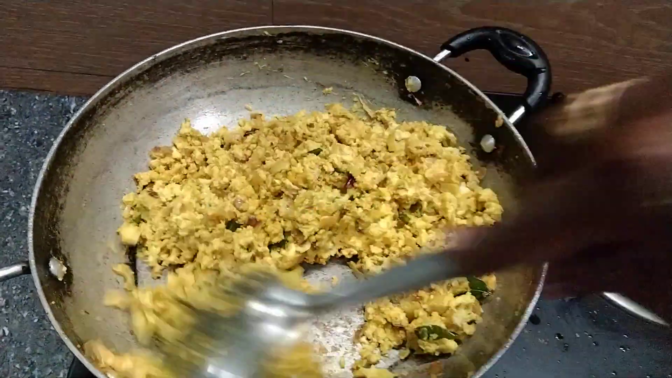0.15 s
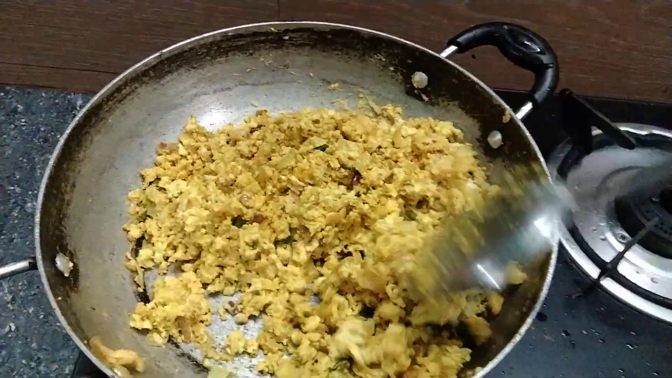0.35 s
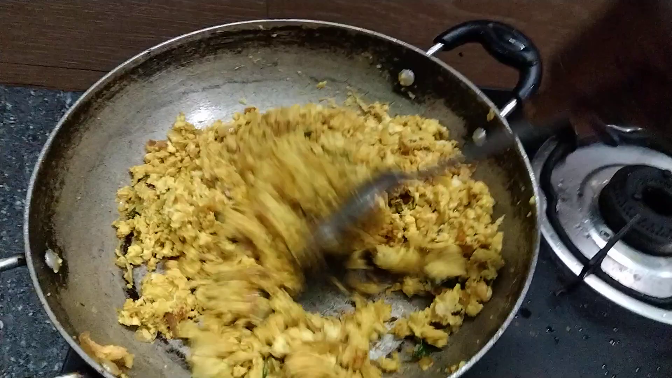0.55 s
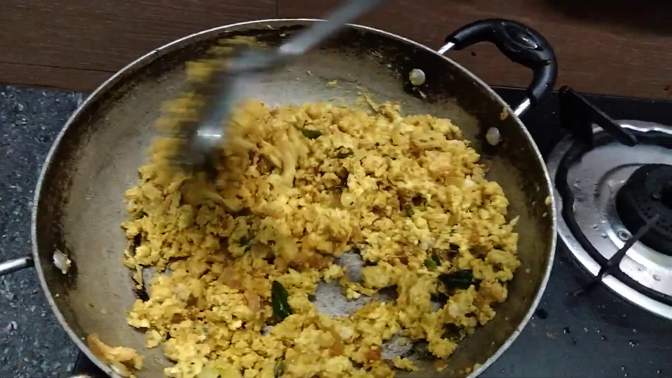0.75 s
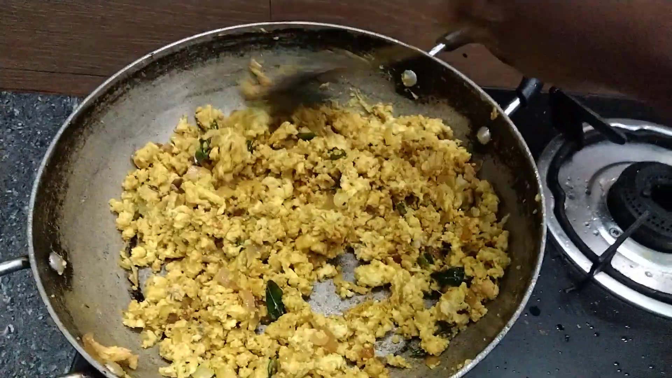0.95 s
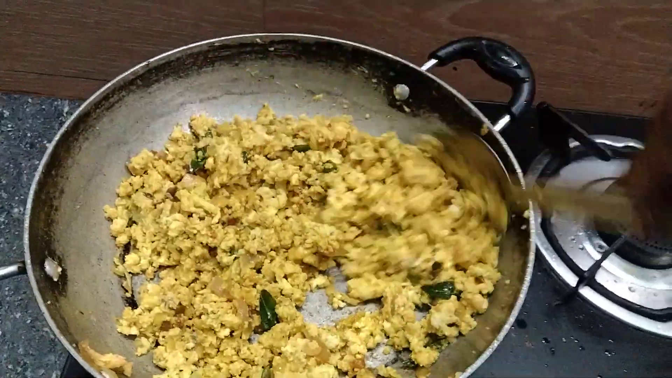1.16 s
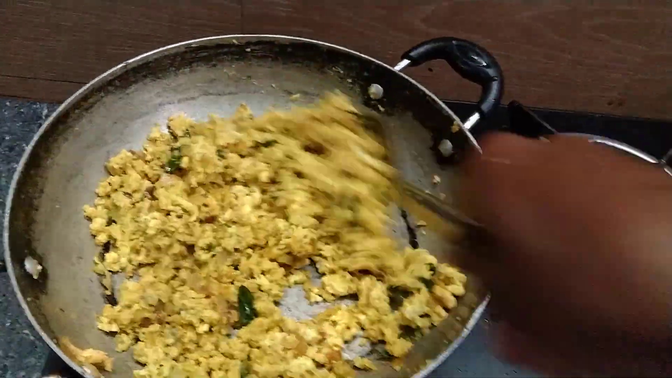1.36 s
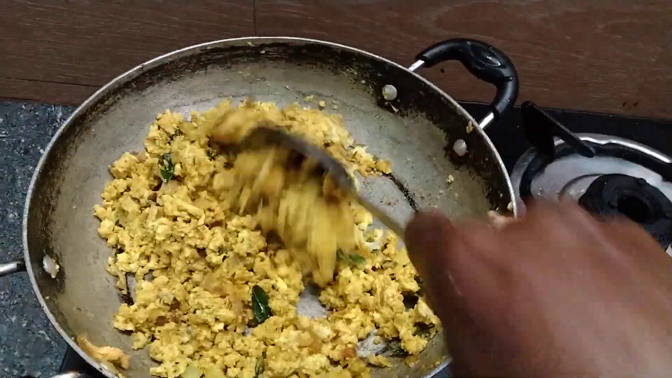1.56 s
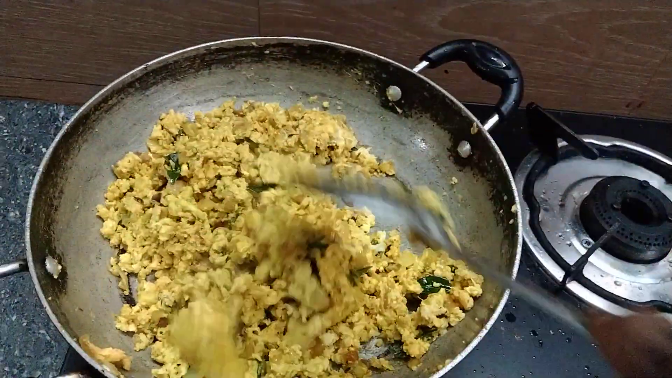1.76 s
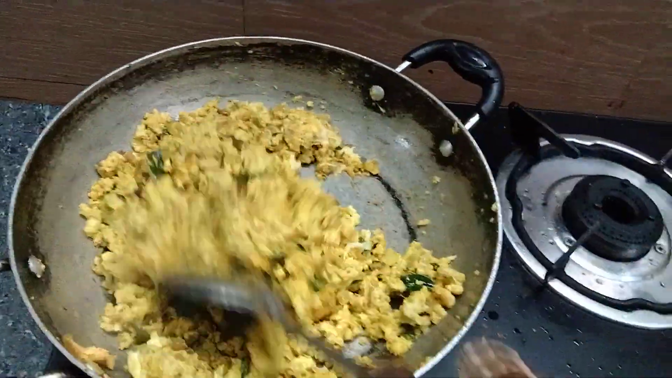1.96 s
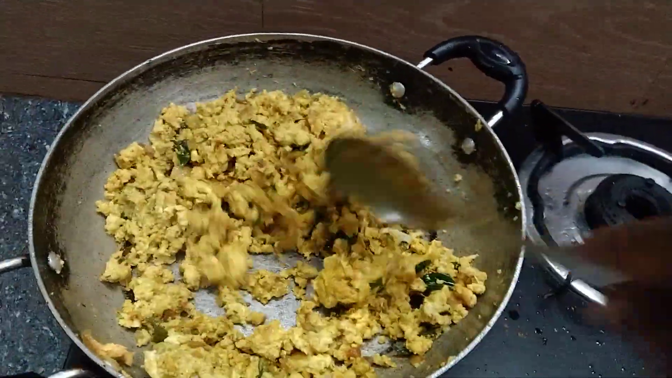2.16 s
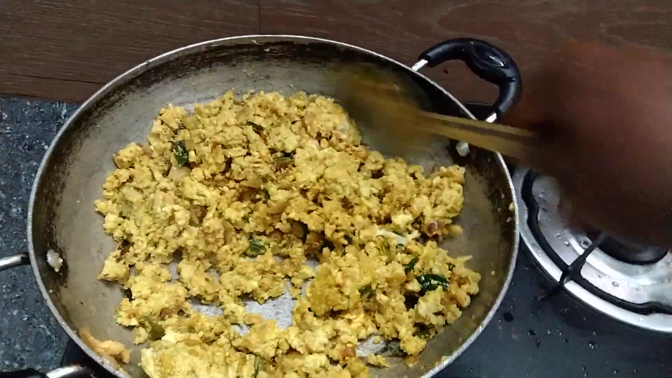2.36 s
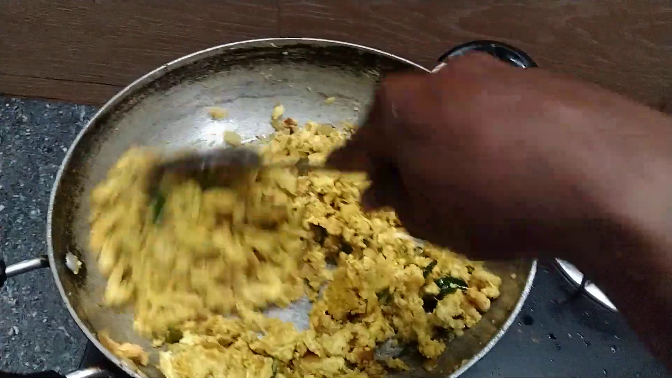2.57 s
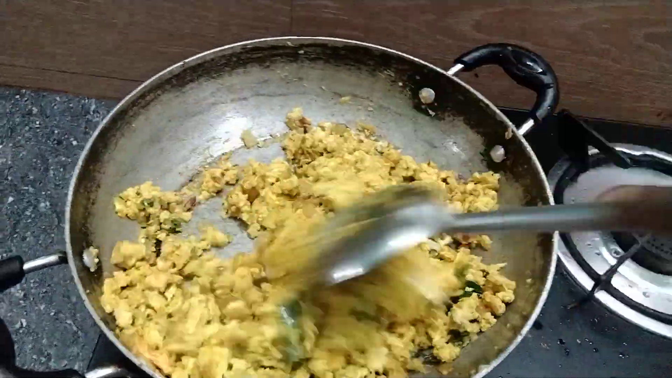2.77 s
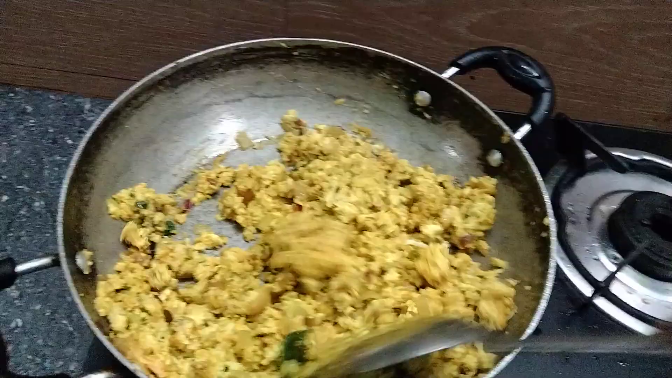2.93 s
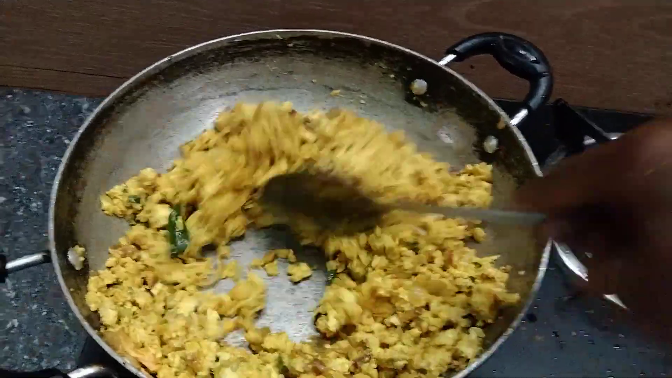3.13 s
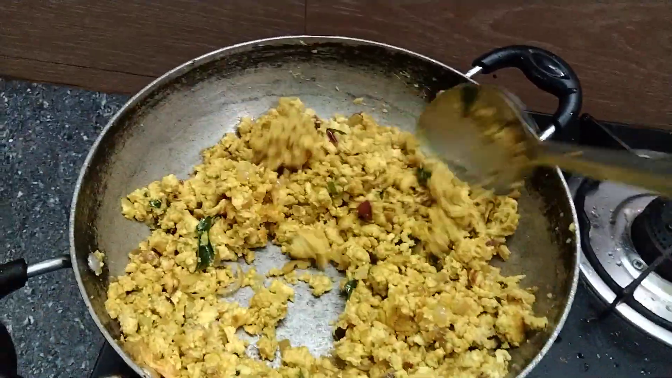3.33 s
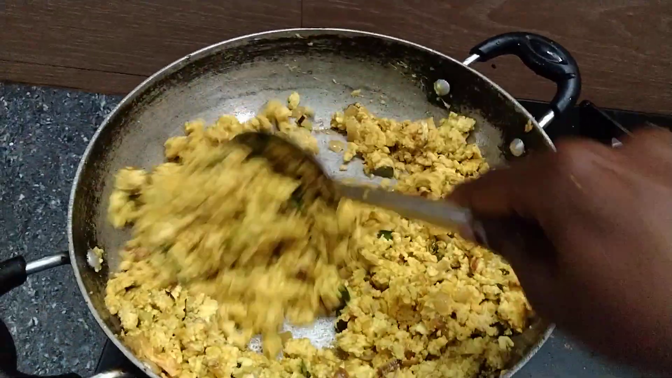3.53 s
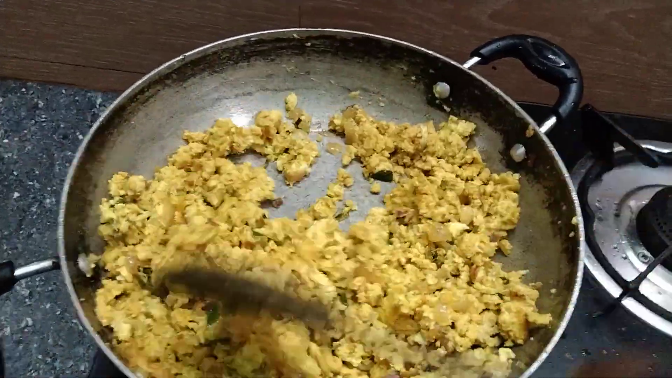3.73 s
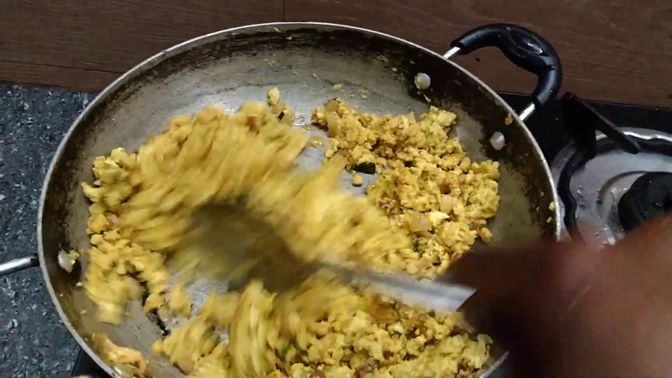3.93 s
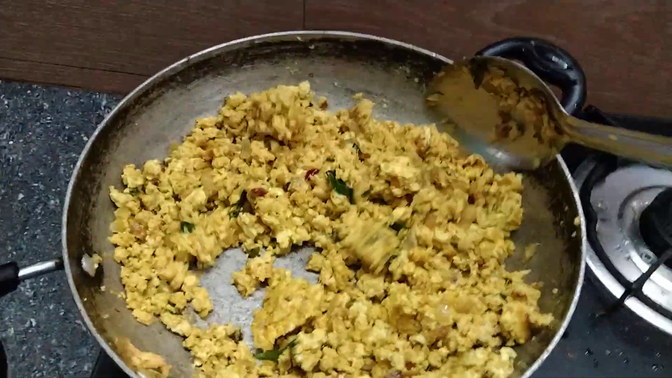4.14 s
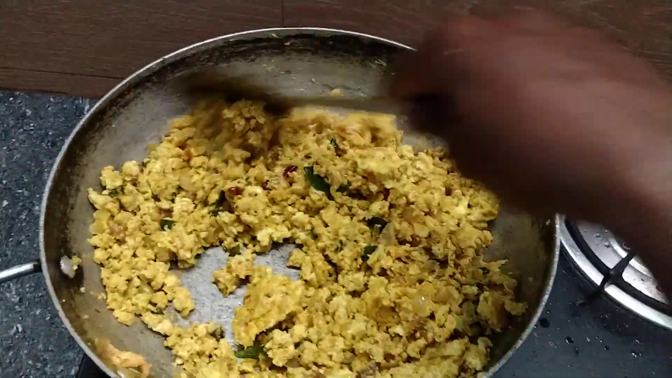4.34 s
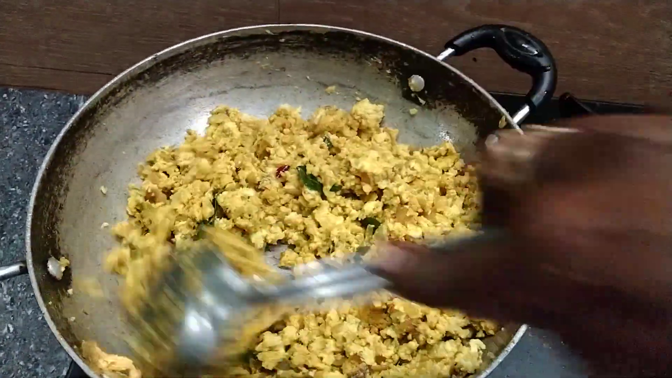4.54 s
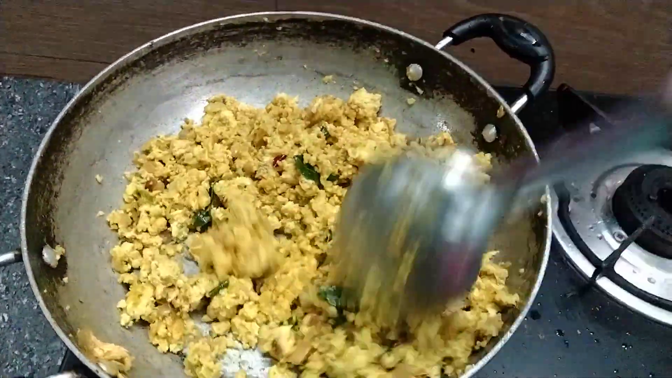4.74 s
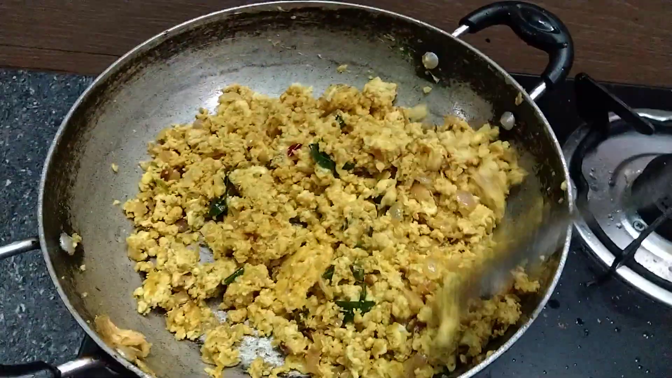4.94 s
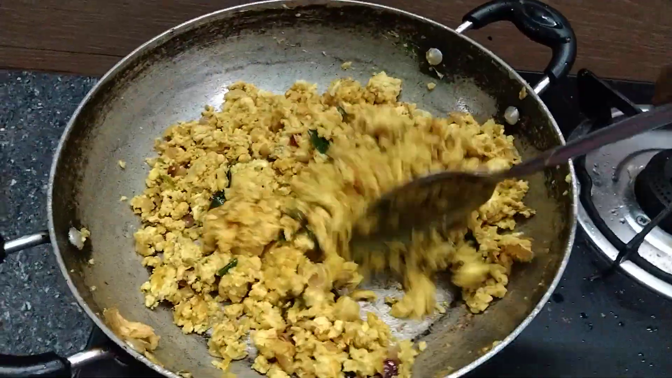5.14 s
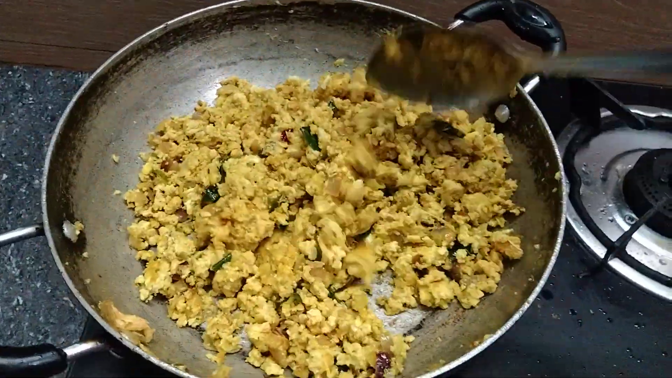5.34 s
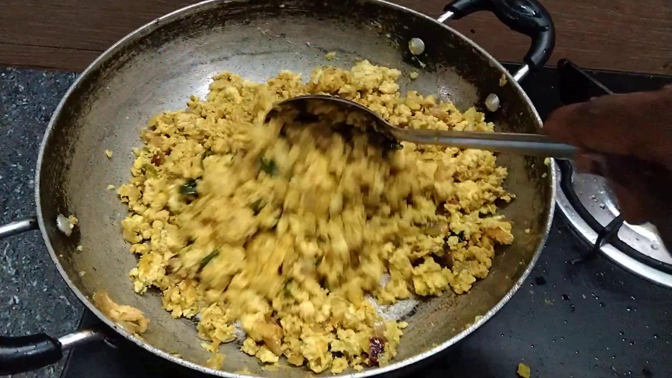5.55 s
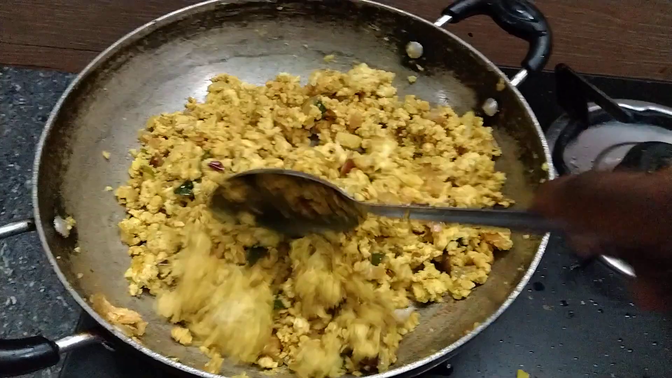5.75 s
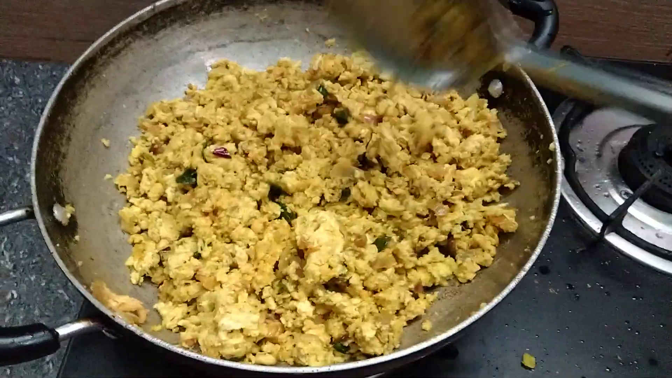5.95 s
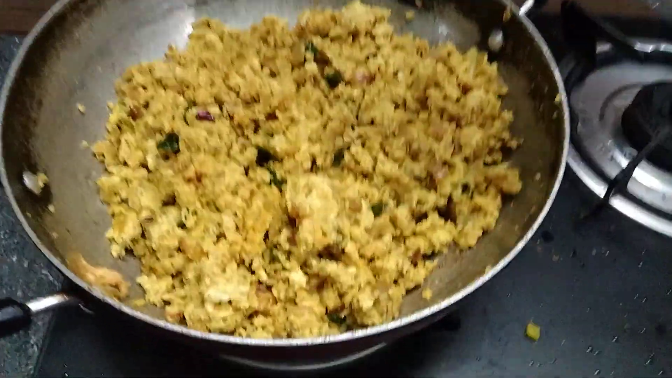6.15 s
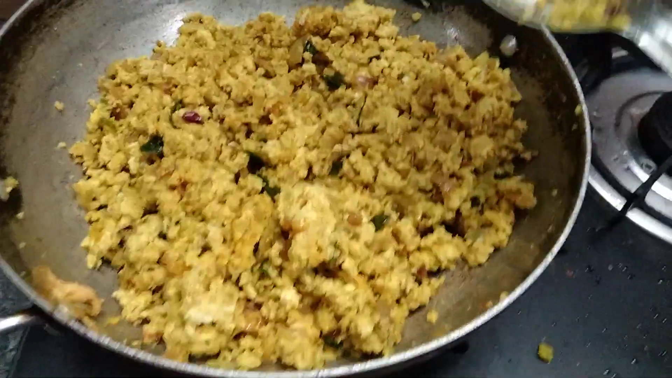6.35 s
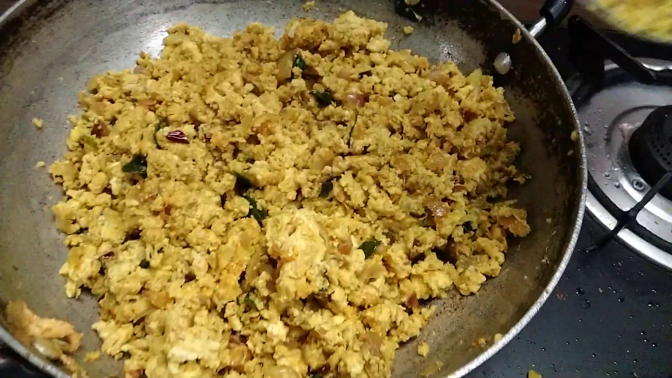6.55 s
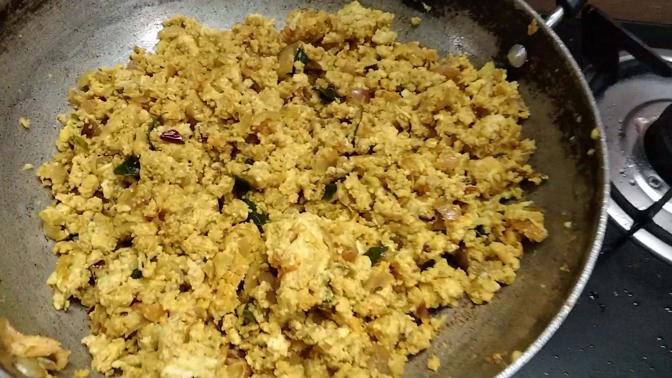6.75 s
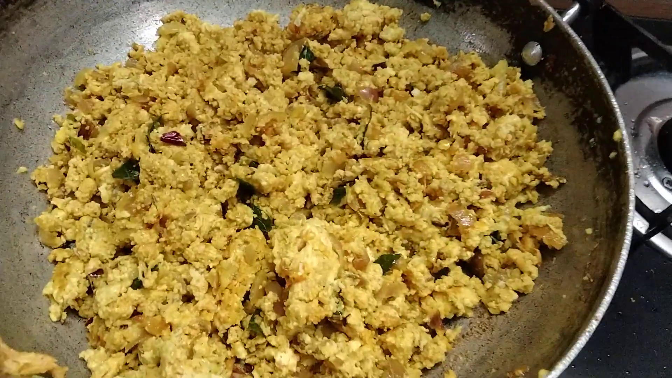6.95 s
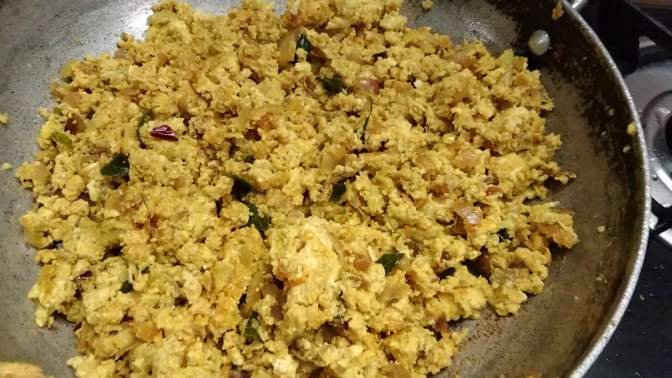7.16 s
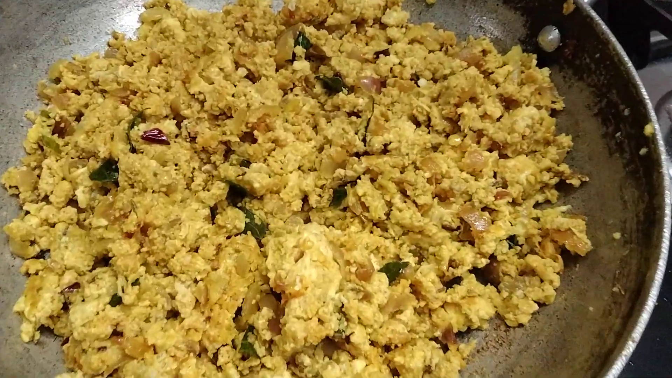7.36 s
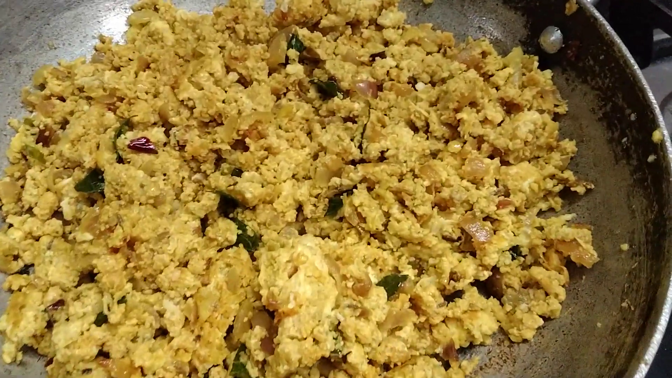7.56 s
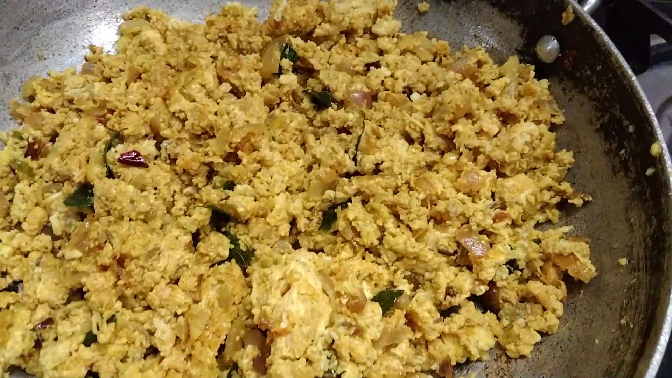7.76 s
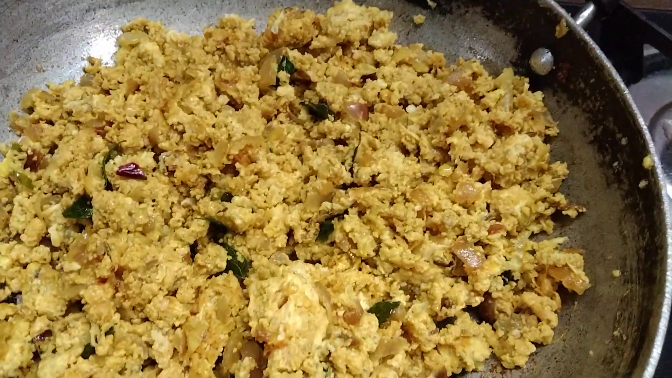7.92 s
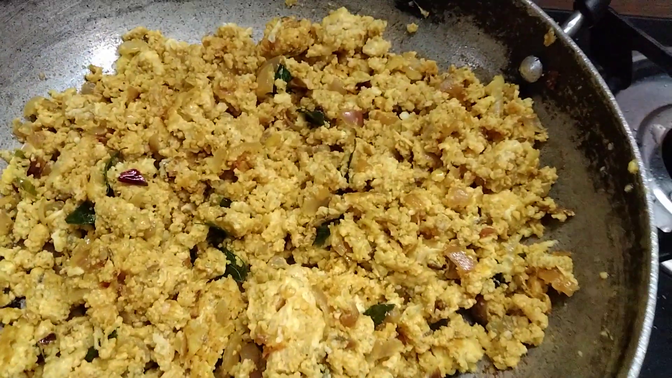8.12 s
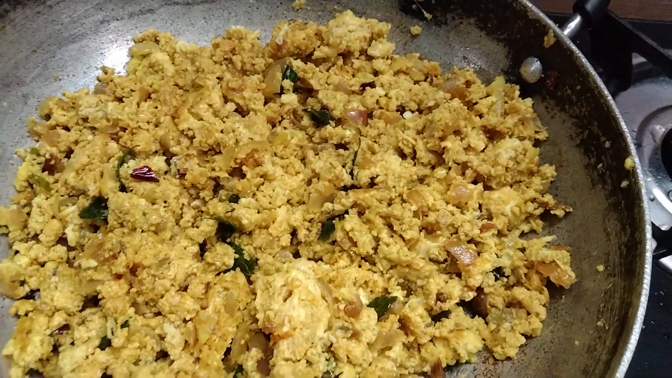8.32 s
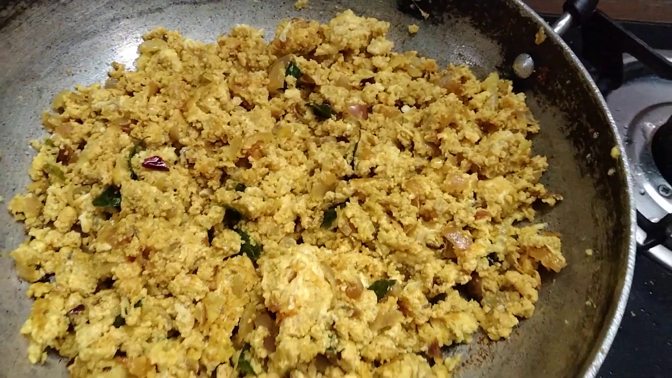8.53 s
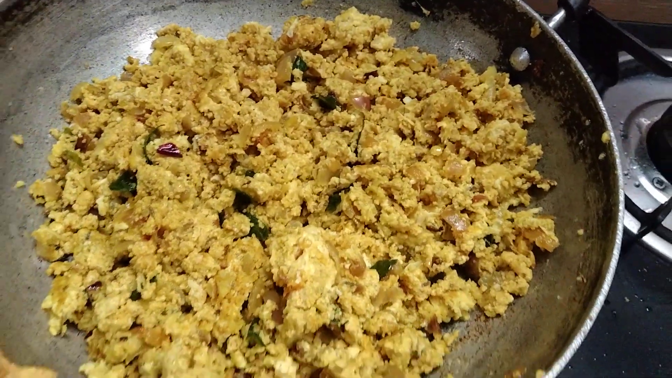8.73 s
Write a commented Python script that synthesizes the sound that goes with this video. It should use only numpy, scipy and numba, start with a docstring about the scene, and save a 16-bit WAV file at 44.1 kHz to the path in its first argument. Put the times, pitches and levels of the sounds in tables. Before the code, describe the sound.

A close, slightly thin phone-like pickup in a small hard kitchen. Moist food sizzles steadily over a faint low hum. A steel spatula scrapes the pan from 0 to 0.2 s, then clanks sharply near 0.6 with a short rattle and scrape. Another edgy knock and scrape come at 1.0, a light touch at 1.3 and a squeaky scrape around 1.45. A bright clank at 2.05 leads into scraping; a very faint brief hoot lies beneath. Softer strokes follow at 2.5-2.7, then a strong clank and loud scrape at 3.1-3.25, with a fat pop at 3.35. Light contact at 3.95 precedes squealing scrapes and clustered knocks at 4.3-4.7. Small taps end the stirring at 5.1-5.2. From about 6.3 the sizzle is quieter and sputtery, with scattered snaps, thickest around 8.2, and soft rustles near 6.6 and 7.6.

```python
"""A steel spatula knocks on a food-damped steel pan, then scrapes along it with brief thin squeals.
Knocks are short rattling clanks; scrapes are stick-slip clicks through moving blade and pan modes.
Each stroke swells, eases and stirs up a hiss; the food sizzles and pops, quieter once left alone.
Sizzle is dense steam bursts coloured by the bowl; two soft rustles, a brief faint tone and a low hum
lie behind. The pan and frying sounds ring on in a small hard kitchen."""
import sys
import numpy as np
from scipy import signal
from scipy.fft import rfft, irfft
from scipy.io import wavfile
from scipy.ndimage import uniform_filter1d
from numba import njit

SR = 44100
rng = np.random.default_rng(int(sys.argv[2]) if len(sys.argv) > 2 else 0)


def store_wav(level_fs):
    """Save 16-bit WAV to argv[1]."""
    pcm = np.round(np.clip(np.atleast_2d(level_fs), -1, 1) * 32767)
    wavfile.write(sys.argv[1], SR, pcm.T.astype(np.int16))


N = 387638
T = np.arange(N) / SR
SIZE = 8192  # FFT length for responses
FREQS = np.maximum(np.fft.rfftfreq(SIZE, 1 / SR), 1)  # Hz

# All resonance widths are taken 6 dB down.
# low air rush: f/Hz, width/Hz, level/dB
RUMBLE = [(93, 74, -2), (145.4, 46, 3), (230.5, 41, 0.5), (329, 82, -7)]
# soft low rustles: start/s, loudest/s, end/s, level/dB
RUSTLES = [(6.405, 6.63, 7.07, -56), (7.54, 7.63, 8.04, -57)]
# rustle body: f/Hz, width/Hz, level/dB
RUSTLE_BODY = [(222, 126, 2), (413, 126, 1), (700, 520, -8)]
# bowl resonances colouring the sizzle: f/Hz, width/Hz, level/dB
BOWL = [(938, 222, 2), (1377, 280, 8), (1916, 480, -1), (2735, 710, -0.5), (3340, 1860, 0.5),
        (5780, 3300, -1), (6850, 2160, 3.5), (9730, 1270, -5.5), (13900, 5800, 0.5)]
# dips that thin the sizzle's colour: f/Hz, width/Hz, depth/dB
DIPS = [(2320, 230, 1), (4390, 610, 1.5), (12000, 2100, 1.5)]
# frying between strokes: t/s, sizzle/dB, fine spray/dB
FRYING = [(0.0, -49, -53.5), (1.6, -49.5, -53), (2.25, -49, -57.5), (2.65, -50.5, -52.5), (3.05, -48, -57),
          (3.5, -47.5, -50.5), (4.3, -49.5, -53), (5.6, -48.5, -52.5), (6.3, -53.5, -60), (8.79, -54, -73)]
# spray flicker, small while the food moves and larger at rest: t/s, spread/dB
SPUTTER = [(5.6, 0.8), (8.79, 4)]
# fat spitting: t/s, peak/dB (before pop_db)
POPS = [(1.412, -35), (3.340, -23.5), (5.079, -37), (6.405, -35), (6.5357, -29.5), (7.029, -39),
        (7.33, -36), (7.648, -31), (7.7985, -33), (7.8408, -33), (7.998, -34.5), (8.118, -31.5),
        (8.195, -28.5), (8.222, -33), (8.238, -34), (8.4554, -33)]
# loaded pan under the blade: f/Hz, width/Hz, level/dB
PAN = [(334, 85, -13), (476, 283, -11), (695, 220, -6.5), (891, 110, -1), (1030, 150, -8.5),
       (1260, 220, -4.5), (1411, 140, 2), (1866, 480, -15), (2806, 690, -15), (3110, 210, -21),
       (3430, 850, -17), (5190, 1000, -19.5), (6420, 360, -13.5), (6940, 340, -18), (7450, 270, -21),
       (8800, 1300, -27.5), (12800, 25000, -33.5)]
# bare rim, not damped by food: f/Hz, width/Hz, level/dB (before rim_db)
RIM = [(880, 14, -9), (927, 13, -8), (966, 12, 0), (1114, 13, -2), (1320, 19, -12), (1387, 22, 3),
       (1424, 7.6, -10), (1535, 16, -21), (1955, 22, -15), (5290, 66, -2)]
# freely ringing steel: f/Hz, level/dB, t60/s
RING = [(995, 0, .33), (1392, -14, .5), (1502, -14, .3), (2105, -16, .1), (2611, -17, .3), (3515, -12, .08),
        (5911, -22, .19)]
# glancing touches: t/s, end/s, level/dB, overtones/dB
GLANCES = [(0.531, 0.593, -27.5, -3), (4.329, 4.405, -38.5, -10)]
# spatula meets pan: t/s, peak/dB (before the rim), thud/dB, brightness/dB, thin edge tick/dB
KNOCKS = [(0.529, -21.5, 12, 9.5, -3), (0.5904, -6, -4.5, -4, 1.5), (0.605, -19.5, -7, -3, -9),
          (0.6246, -25, -3, -1, -8), (1.0188, -6.5, 0, -9.5, 10), (1.075, -24, -8, -18, 4),
          (1.295, -35, 6, -2, -2), (1.471, -26, -14, 4, -4), (1.52, -29, 0, 7, -9),
          (2.0424, -3.5, -17.5, -3, -1.5), (2.477, -20, 4, -5, -15), (2.847, -37, 6, -2, 0),
          (3.1137, -7.5, -16, -8.5, -7), (3.151, -16, -2, -8, -10), (3.197, -28, -11, -5, -5),
          (3.931, -29, -3, -5, -4), (4.323, -29, 10, -9, 5), (4.569, -18.5, -15, -15, 4),
          (4.621, -14, -13, -24, 6), (4.658, -20, -1, -11, 2), (4.702, -19.5, 3.5, -4, 9),
          (5.1068, -25.5, 0.5, -4, 0), (5.186, -30.5, 7, -8, 4), (5.2005, -31, 1, 3, 0)]
# rattle after a blow, relatively more for a light one: peak/dB, rattle re first touch/dB
RATTLE = [(-30, 3), (-5, -8)]
# edge singing on one steel mode: start/s, aimed loudest/s (kept inside), end/s, f/Hz, level/dB;
#   a row ending well before its start is silent
SQUEALS = [(0.615, 0.628, 0.68, 3930, -42), (1.43, 1.475, 1.54, 2720, -53), (1.445, 1.473, 1.53, 5380, -44),
           (1.43, 1.48, 1.55, 6560, -43.5), (2.051, 2.057, 2.05, 5180, -41), (2.1, 2.135, 2.02, 5220, -48),
           (2.1, 2.14, 2.19, 2960, -46), (2.488, 2.555, 2.58, 2850, -50.5), (2.53, 2.58, 2.65, 5230, -52),
           (2.53, 2.565, 2.63, 6700, -49), (3.15, 3.17, 3.24, 3920, -44), (3.14, 3.205, 3.23, 2890, -41),
           (4.41, 4.435, 4.48, 6750, -41), (4.44, 4.475, 4.51, 1810, -46), (4.445, 4.475, 4.53, 3690, -47),
           (4.597, 4.653, 4.715, 2556, -46), (4.63, 4.69, 4.73, 5040, -55), (5.2, 5.21, 5.245, 2800, -51),
           (5.205, 5.21, 5.23, 2010, -55)]
# scraping strokes: start/s, aimed hardest push/s (kept inside), end/s,
#   blade level/dB (before scrape_db), blade pitch/Hz, slide/(Hz/s), blade width/Hz,
#   flexing/dB, twisting/dB, overtones/dB, pan bottom/dB, thud/dB, pan wall f/Hz, wall/dB,
#   grit/dB, scratch/dB, hiss of turned food/dB
# A row ending well before its start scrapes silently; only its hiss may be heard.
# Flexing, twisting and overtones are re the main blade mode, thud re the bottom, hiss stands alone;
# bottom, wall, grit and scratch are re the blade.
STROKES = [ (-0.02, -0.005, 0.11, -36.5, 1340, -500, 130, -18, -3, -23, -4, 0.5, 975, -21, -6, -15, -48),
           (0.06, 0.122, 0.21, -27.5, 1243, -250, 123, -21, -7, -25, -8.5, 10, 978, -7.5, -20, -10, -43.5),
           (0.529, 0.545, 0.6, -42, 1480, 0, 260, -12, 0, -4, -1, 5, 965, -7, 5, -10, -57),
           (0.596, 0.6, 0.68, -25, 1473, -300, 232, -8, -3.5, -16, -7, 3, 1000, -12, -8, -18, -49),
           (1.028, 1.083, 1.157, -26.7, 1320, -450, 105, -13, -32, -21.5, -23, -2, 920, -17, -28, -23, -47.5),
           (1.193, 1.194, 1.227, -40, 1273, -400, 110, -23, -22, -11, -0.5, 12, 970, -18, -14, -19, -53),
           (1.295, 1.303, 1.325, -39.5, 1320, 0, 90, -20, -16, -13, -7.5, 14, 960, -24, -18, -21, -63),
           (1.412, 1.488, 1.552, -26, 1353, 298, 197, -26, -29, -15, -21, 30, 955, -31, -10.5, -21, -64),
           (2.053, 2.06, 2.08, -31, 1396, 0, 110, -25, -15, -16, -9, -9, 1047, 4, -17, -25, -64),
           (2.07, 2.138, 2.216, -25.5, 1480, -300, 260, -42, -6.5, -19, -10.5, -13.5, 938, -3, -10.5, -33, -70),
           (2.482, 2.49, 2.54, -37, 1360, -300, 120, -14, -22, -28, -8, 5, 906, -12, -22, -24, -55),
           (2.517, 2.592, 2.697, -38.5, 1296, -500, 130, -18, -3.5, -14, -4.5, -0.5, 950, -27, -11, -11, -47.5),
           (3.117, 3.166, 3.245, -19.5, 1463, -250, 150, -33, -15, -22, -24, 3, 1088, -6, -11, -26, -51),
           (3.94, 3.968, 4.04, -49.5, 1370, -260, 160, -7, -10, -7, -1, 6, 950, -10, 2, -10, -47),
           (4.327, 4.342, 4.3, -41, 1410, -2, 200, -8, -22, -25, -4, 25, 980, -13, -22, -20, -66),
           (4.4, 4.472, 4.66, -31.5, 1310, -350, 130, -12, -8.5, -17.5, -9.5, 4, 996, -25, -19, -11.5, -45.5),
           (4.525, 4.625, 4.705, -27, 1330, 100, 149, -6.5, -24, -28, -2, -8.5, 935, -3, -32, -18, -44.5),
           (5.194, 5.217, 5.21, -43.5, 1420, -260, 190, -8, -16, -11, 2, 10, 920, -5, -6, -15, -46), ]
# blade modes re its pitch: flexing, main, twisting, two overtones [ratio]
BLADE_RATIOS = [0.52, 1, 1.39, 1.98, 2.8]
# grit falls off steeper on the wall: from this wall level/dB, exponent of frequency per dB
WALL_DULLING = (-15, 0.06)
# thin edge on steel: f/Hz, width/Hz, level/dB
SCRATCH = [(5130, 160, -9), (6220, 390, -8), (6610, 180, -4.5), (7370, 400, -3), (9460, 320, -8)]

HUM_HZ, HUM_DB, RUMBLE_DB = 130.5, -58.5, -64.5
TOP_HZ = 15550
SPREAD_S = 0.0006  # bending-wave lag at 1 kHz
# stroke-end drop, arch roundness (exponent), time to touch down and lift
SWELL_DB, SWELL_SHAPE, CONTACT_S = 13, 1.65, 0.012
GRIT_FOLLOWS = 0.5  # share of the swell/dB taken by the grit
WOBBLE = 0.018  # relative pitch waver as the contact point shifts
JUDDER_DB = 0.8  # tremble of the hand's pressure
WALL_WIDTH_HZ = 110


def amp(db):
    """Decibels to gain."""
    return 10 ** (np.asarray(db) / 20)


def unit(x):
    """Scale to rms 1."""
    return x / np.sqrt(np.mean(x ** 2))


def through(x, response):
    """Convolve with an impulse response, keeping the length."""
    return signal.fftconvolve(x, response)[:len(x)]


def add(track, start_s, sound):
    """Mix a sound into the track at start_s."""
    i = max(int(start_s * SR), 0)
    track[i:i + len(sound)] += sound[:max(N - i, 0)]


def resonances(modes):
    """Gain over FREQS of steep-sided resonances, summed in power."""
    return np.sqrt(sum((amp(db) / (1 + (2 * (FREQS - hz) / width_hz) ** 2)) ** 2
                       for hz, width_hz, db in modes))


def above(hz):
    """Steep high-pass gain over FREQS."""
    return 1 / np.sqrt(1 + (hz / FREQS) ** 14)


def below(hz):
    """Steep low-pass gain over FREQS."""
    return 1 / np.sqrt(1 + (FREQS / hz) ** 14)


def impulse(gain, spread_s=0):
    """Causal response with this gain; bending waves lag more the lower they are (spread_s at 1 kHz)."""
    cepstrum = irfft(np.log(gain + 1e-6))
    cepstrum[1:SIZE // 2] *= 2  # fold to causal
    cepstrum[SIZE // 2 + 1:] = 0
    lag_rad = 4 * np.pi * spread_s * np.sqrt(1000 * FREQS)
    return irfft(np.exp(rfft(cepstrum) - 1j * lag_rad))[:SIZE // 2]


def walk(rate_hz):
    """Random levels held 1 / rate_hz and smoothed twice; spread near 1."""
    hold = int(SR / rate_hz)
    steps = np.repeat(rng.standard_normal(N // hold + 1), hold)
    return 1.3 * uniform_filter1d(uniform_filter1d(steps, hold), hold)[:N]


def grains(rate_hz, spread_db):
    """Random clicks, rms 1; positive spread_db makes a few much larger, negative a few smaller."""
    size = amp(spread_db * np.minimum(rng.exponential(size=N), 6))
    return unit((rng.random(N) < rate_hz / SR) * size * rng.standard_normal(N))


@njit
def bandpass(x, hz, width_hz):
    """State-variable band-pass whose centre and width may move."""
    y, band, low = np.empty(len(x)), 0., 0.
    for i in range(len(x)):
        g, k = np.tan(np.pi * hz[i] / SR), width_hz[i] / hz[i]
        v = (band + g * (x[i] - low)) / (1 + g * (g + k))
        band, low, y[i] = 2 * v - band, low + 2 * g * v, k * v
    return y


def mode(slips, hz, width_hz):
    """One steep-sided resonance whose pitch may move; rms 1."""
    widths_hz = np.full(len(hz), float(width_hz))
    return unit(bandpass(bandpass(slips, hz, widths_hz), hz, widths_hz))


def arch(t, start_s, top_s, end_s, depth_db, shape, fade_s):
    """One push of the hand: level/dB, 0 at the top, and a faded gate."""
    top_s = np.clip(top_s, start_s + 0.006, end_s - 0.006)  # room to build and ease
    slack = np.interp(t, [start_s, top_s, end_s], [1, 0, 1])
    gate = np.interp(t, [start_s - fade_s, start_s, end_s, end_s + fade_s], [0, 1, 1, 0])
    return -depth_db * slack ** shape, gate


def kitchen(t60_s=0.43, treble_t60_s=0.29, damp_hz=4000, first_wall_s=0.0067):
    """Small hard room, energy 1: faint until the first walls answer; the treble dies first."""
    t = T[:SR * 3 // 4]
    noise = rng.standard_normal(len(t))
    low = signal.sosfiltfilt(signal.butter(2, damp_hz, fs=SR, output="sos"), noise)
    tail = low * amp(-60 * t / t60_s) + (noise - low) * amp(-60 * t / treble_t60_s)
    tail *= np.interp(t, [0, first_wall_s * 1.08, first_wall_s], [.1, .4, 1])
    return tail / np.sqrt(np.sum(tail ** 2))


def hum():
    """A slightly wavering fan hum over a low rush of air."""
    hz = HUM_HZ + 1.23 * walk(11)
    tone = np.sin(2 * np.pi * np.cumsum(hz) / SR) * amp(0.88 * walk(6.6))
    air_gain = resonances(RUMBLE) * above(90) + amp(-13.0) * below(110)
    air = through(rng.standard_normal(N), impulse(air_gain))
    return amp(HUM_DB) * unit(tone) + amp(RUMBLE_DB) * unit(air)


def faint_tone(hz=440, db=-54):
    """A brief, faint hoot: one gated sine."""
    gate = np.interp(T, [1.915, 1.95, 2.02, 2.07], [0, 1, 1, 0])
    return amp(db) * gate * np.sin(2 * np.pi * hz * T)


def rustle(depth_db=12, shape=1.9, fade_s=0.04, brush_db=-5, brush_hz=12500):
    """Two dull, soft rustles: dense grains in a low body, plus a fine brushing hiss."""
    fibres = grains(rate_hz=1100, spread_db=-1.5)
    rub = unit(through(fibres, impulse(resonances(RUSTLE_BODY))))
    brush = unit(through(rng.standard_normal(N), impulse(above(brush_hz) * below(TOP_HZ))))
    level = 0
    for start_s, top_s, end_s, db in RUSTLES:
        push_db, touching = arch(T, start_s, top_s, end_s, depth_db, shape, fade_s)
        level = level + amp(db + push_db) * touching
    return level * (rub + amp(brush_db) * brush)


def bowl_colour():
    """Gain of the bowl's resonances over FREQS, thinned by the dips."""
    dip_db = sum(db / (1 + (2 * (FREQS - hz) / width_hz) ** 4) for hz, width_hz, db in DIPS)
    return resonances(BOWL) * amp(-dip_db)


def flares(depth_db=9, shape=3.7, fade_s=0.11):
    """Gain of the extra hiss as each stroke turns moist food onto hot steel."""
    out = np.zeros(N)
    for start_s, top_s, end_s, *_, hiss_db in STROKES:
        near = (T > start_s - fade_s) & (T < end_s + fade_s)
        push_db, touching = arch(T[near], start_s, top_s, end_s, depth_db, shape, fade_s)
        out[near] += amp(hiss_db + push_db) * touching
    return out


def sizzle(spray_hz=8500, flare_hiss_db=0, flare_spray_db=-3.0, split_hz=4400, waver_db=0.95):
    """Dense steam bursts and sparse crackle through the bowl; the spray fades and sputters at rest."""
    times_s, *levels_db = np.transpose(FRYING)
    hiss_db, spray_db = (np.interp(T, times_s, level_db) for level_db in levels_db)
    sputter_db = np.interp(T, *np.transpose(SPUTTER))
    crackle = amp(-12) * grains(rate_hz=130, spread_db=1.3)
    bursts = grains(rate_hz=9000, spread_db=-0.5) * amp(0.48 * walk(14)) + crackle
    bowl, flare = bowl_colour() * above(720), flares()
    # hiss bands flicker independently
    hiss = 0
    for part in (below(split_hz), above(split_hz)):
        band = through(bursts, impulse(bowl * below(spray_hz) * part))
        hiss = hiss + band * amp(waver_db * walk(16))
    # so do spray bands
    spray = 0
    for part in (below(11960), above(13300)):
        droplets = grains(rate_hz=5000, spread_db=0.7)
        band = through(droplets, impulse(bowl * above(spray_hz) * part))
        spray = spray + band * amp(1.2 * walk(45))
    spray = unit(spray) * amp(sputter_db * walk(26))
    hiss_level = np.hypot(amp(hiss_db), amp(flare_hiss_db) * flare)
    spray_level = np.hypot(amp(spray_db), amp(flare_spray_db) * flare)
    return hiss_level * unit(hiss) + spray_level * spray


def pops(fizz_s=0.00088, fizz_db=-11, steam_s=0.037, steam_db=-26, pop_db=-1.0):
    """Single larger bursts: a snap with its own pitch, a very short fizz and a wisp of steam."""
    out, bowl, t = np.zeros(N), bowl_colour() * above(790), T[:SR // 10]
    for time_s, db in POPS:
        fizz = amp(fizz_db) * np.exp(-t / fizz_s) + amp(steam_db) * np.exp(-t / steam_s)
        burst = (t == 0) + fizz * rng.standard_normal(len(t))
        snap_hz = 5000 * 2 ** (0.15 * rng.standard_normal())
        tick = through(burst, impulse(bowl * resonances([(snap_hz, 11000, 0)])))
        add(out, time_s, amp(db + pop_db) * tick / np.abs(tick).max())
    return out


def pan_spot(ripple_db=5, mode_gap_hz=75):
    """Gain of the pan touched at one spot: each favours others of the crowded high modes."""
    ripple = np.interp(FREQS / mode_gap_hz, np.arange(SIZE), rng.standard_normal(SIZE))
    depth_db = ripple_db * above(2100) * np.minimum(FREQS / 6500, 1)
    power_db = depth_db ** 2 * np.log(10) / 20  # mean power added by the ripple
    return resonances(PAN) * above(137) * amp(depth_db * ripple - power_db)


def with_rim(contact, rim_db=0.5):
    """A contact sound together with the undamped rim's brief ring."""
    return contact + amp(rim_db) * through(contact, impulse(resonances(RIM)))


def glances():
    """Steel rings unsteadily after a light touch, each mode on its own, until the next contact."""
    out, t = np.zeros(N), T[:SR // 4]
    for k, (hz, mode_db, t60_s) in enumerate(RING):
        phase = 2 * np.pi * np.cumsum(hz + 6 * walk(120)) / SR
        tone = np.sin(phase) * amp((3 if k else 1.2) * walk(110))
        for time_s, end_s, db, overtone_db in GLANCES:
            decay = amp(db + mode_db + overtone_db * (k > 0) - 60 * t / t60_s)
            gate = np.clip(np.minimum(t, end_s - time_s - t) / 0.0024, 0, 1)
            add(out, time_s, decay * gate * tone[int(time_s * SR):][:len(t)])
    return out


def rattle(db, fade_s=0.0045, rate_hz=1500):
    """One touch plus a quickly dying burst of tiny rebounds, db re the touch."""
    t = T[:SR // 20]
    hits = rng.random(len(t)) < rate_hz / SR
    rebounds = hits * rng.standard_normal(len(t)) * np.exp(-t / fade_s)
    return (t == 0) + amp(db) * rebounds / np.sqrt(np.sum(rebounds ** 2))


def knocks(thud_hz=680, bright_hz=2000, edge_hz=6000):
    """Blows clank and rattle the pan: flat blade thuds, bare steel is bright, thin edge ticks."""
    out = np.zeros(N)
    for time_s, db, thud_db, bright_db, edge_db in KNOCKS:
        colour_db = thud_db * below(thud_hz) + bright_db * above(bright_hz) + edge_db * above(edge_hz)
        response = impulse(pan_spot() * amp(colour_db), SPREAD_S)
        rattle_db = np.interp(db, *np.transpose(RATTLE))
        clank = through(response, rattle(rattle_db))
        add(out, time_s, amp(db) * clank / np.abs(clank).max())
    return out


def squeals(width_hz=130, waver=0.0051, depth_db=9, shape=1.9):
    """Slips feed one narrow, wavering mode of the steel, which swells and dies."""
    out, slips = np.zeros(N), grains(rate_hz=2100, spread_db=0.6)
    drift = 1 + waver * walk(40)
    for start_s, top_s, end_s, hz, db in SQUEALS:
        near = (T > start_s - CONTACT_S) & (T < end_s + CONTACT_S)
        push_db, touching = arch(T[near], start_s, top_s, end_s, depth_db, shape, CONTACT_S)
        out[near] += amp(db + push_db) * touching * mode(slips[near], hz * drift[near], width_hz)
    return out


def blade_ring(slips, hz, width_hz, flex_db, twist_db, overtone_db):
    """The blade's modes all move with its pitch; the overtones are broader."""
    out = 0
    levels_db = (flex_db, 0, twist_db, overtone_db, overtone_db)
    for ratio, db in zip(BLADE_RATIOS, levels_db):
        out = out + amp(db) * mode(slips, ratio * hz, width_hz * max(ratio / 1.4, 1) ** 2)
    return unit(out)


def pan_parts(thud_db, wall_db, thud_hz=620, bottom_hz=1070, grit_hz=1760, grit_tilt=0.038):
    """Gains of the bottom and of the gritty high modes; each stroke crosses another part of the pan."""
    pan, (from_db, dulling) = pan_spot(), WALL_DULLING
    tilt = grit_tilt - dulling * max(wall_db - from_db, 0)
    bottom = pan * below(bottom_hz) * amp(thud_db * below(thud_hz))
    grit = pan * above(grit_hz) * np.maximum(FREQS / 3500, 1) ** tilt
    return bottom, grit


def stroke(slips, catches, wobble, t, start_s, top_s, end_s, db, blade_hz, slide_hz_per_s, width_hz,
           flex_db, twist_db, overtone_db, bottom_db, thud_db, wall_hz, wall_db, grit_db, scratch_db):
    """Slips ring the blade, the pan's bottom and wall, and its high modes; the edge scratches."""
    push_db, touching = arch(t, start_s, top_s, end_s, SWELL_DB, SWELL_SHAPE, CONTACT_S)
    glide_hz = slide_hz_per_s * (t - top_s)
    blade = blade_ring(slips, (blade_hz + glide_hz) * wobble, width_hz, flex_db, twist_db, overtone_db)
    wall = mode(slips, (wall_hz + glide_hz) / wobble, WALL_WIDTH_HZ)
    bottom, grit = (unit(through(slips, impulse(gain))) for gain in pan_parts(thud_db, wall_db))
    scratch = unit(through(catches, impulse(resonances(SCRATCH) * above(5300))))
    body = blade + amp(bottom_db) * bottom + amp(wall_db) * wall + amp(scratch_db) * scratch
    gritty = amp(grit_db + GRIT_FOLLOWS * push_db) * grit
    return amp(db) * touching * (amp(push_db) * body + gritty)


def scraping(scrape_db=-3.0):
    """The blade sticks and slips over the steel; its edge catches on coarser crumbs."""
    out = np.zeros(N)
    slips = grains(rate_hz=1900, spread_db=0.6) * amp(1.5 * walk(150))
    catches = grains(rate_hz=700, spread_db=0.9) * amp(2 * walk(90))
    wobble, judder = 1 + WOBBLE * walk(35), amp(JUDDER_DB * walk(110))
    for start_s, top_s, end_s, *colour, _ in STROKES:
        near = (T > start_s - CONTACT_S) & (T < end_s + CONTACT_S)
        out[near] += stroke(slips[near], catches[near], wobble[near], T[near],
                            start_s, top_s, end_s, *colour)
    return amp(scrape_db) * judder * out


def scene():
    """Pan and frying sounds arrive directly and by way of the walls; the background is direct."""
    background = rustle() + hum() + faint_tone()
    frying = sizzle() + pops()
    blows = with_rim(knocks()) + glances()
    scrapes = with_rim(scraping()) + squeals()
    walls = through(amp(-2) * blows + amp(-7.0) * scrapes + amp(-11.5) * frying, kitchen())
    return (blows + scrapes + frying + walls + background)[None]


def record(dry):
    """The phone thins the deep bass and cuts the top."""
    thin = signal.sosfilt(signal.butter(2, 60, "highpass", fs=SR, output="sos"), dry)
    return signal.sosfilt(signal.ellip(10, .2, 70, TOP_HZ, fs=SR, output="sos"), thin)


dry = scene()
out = record(dry)
store_wav(out)
```